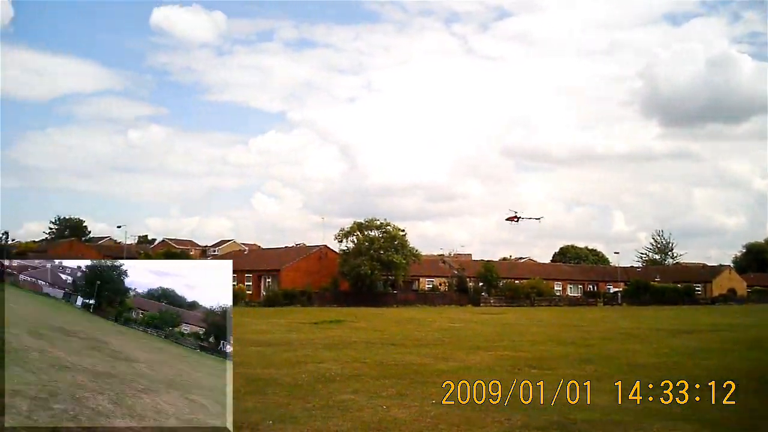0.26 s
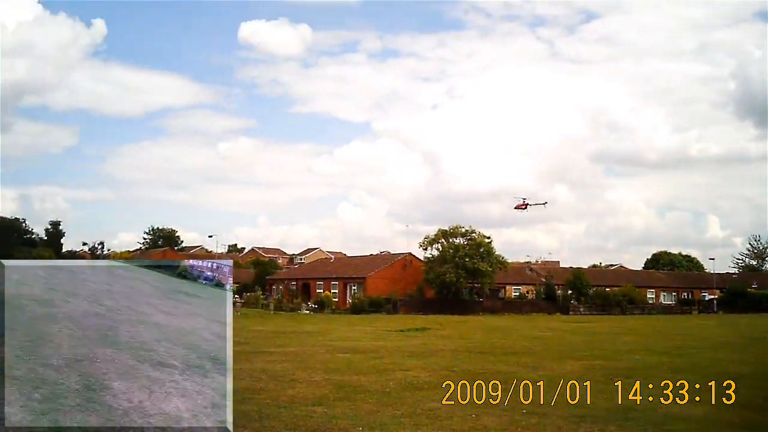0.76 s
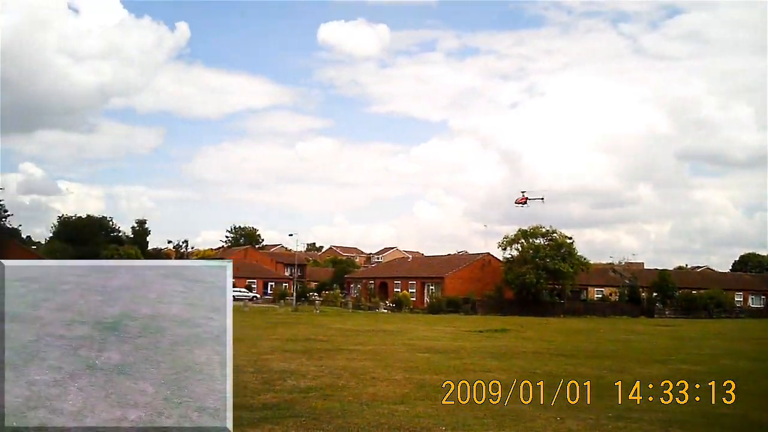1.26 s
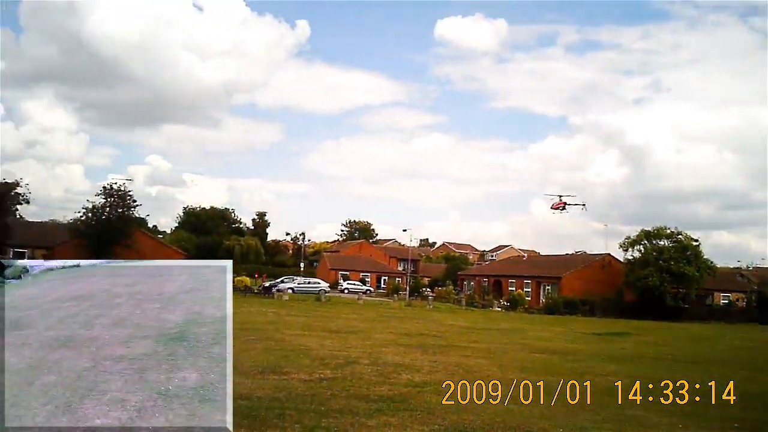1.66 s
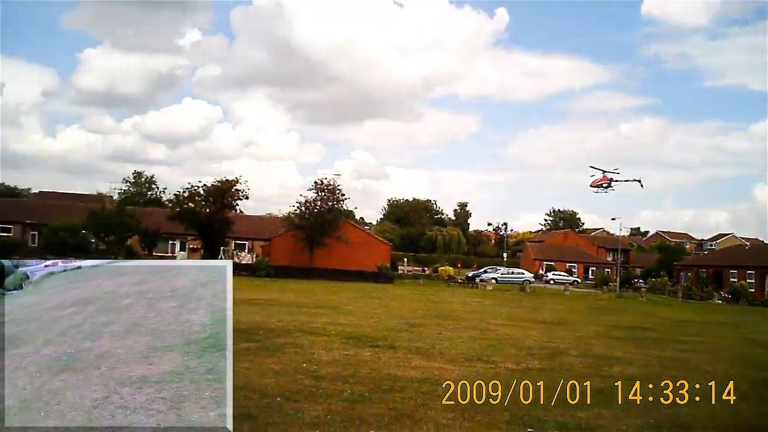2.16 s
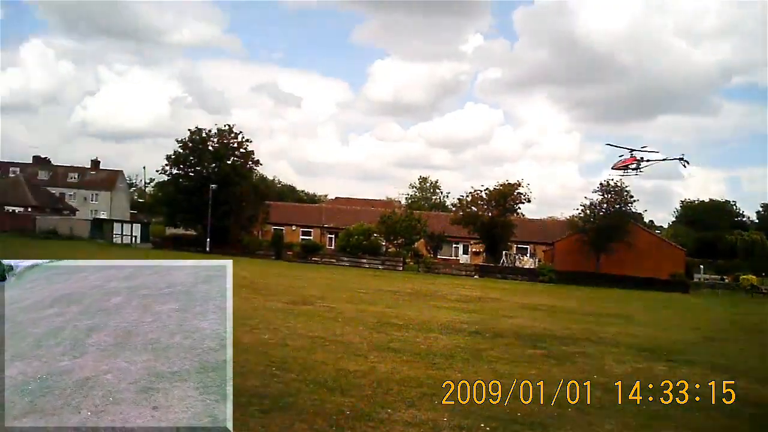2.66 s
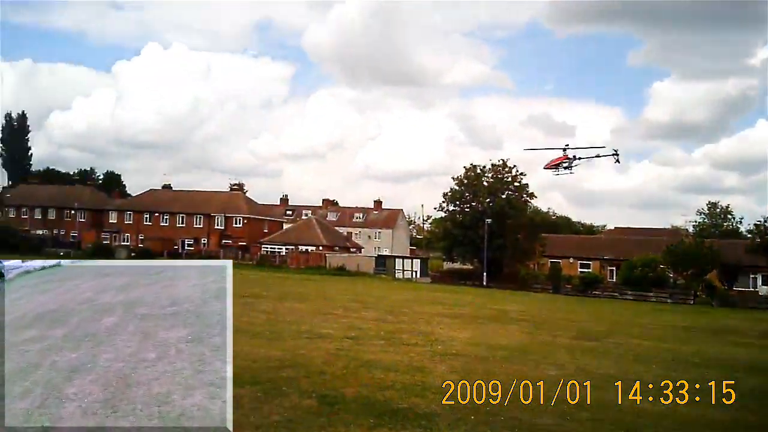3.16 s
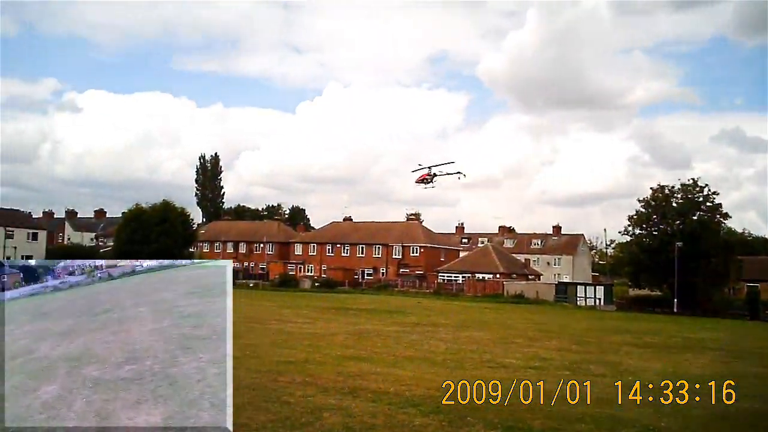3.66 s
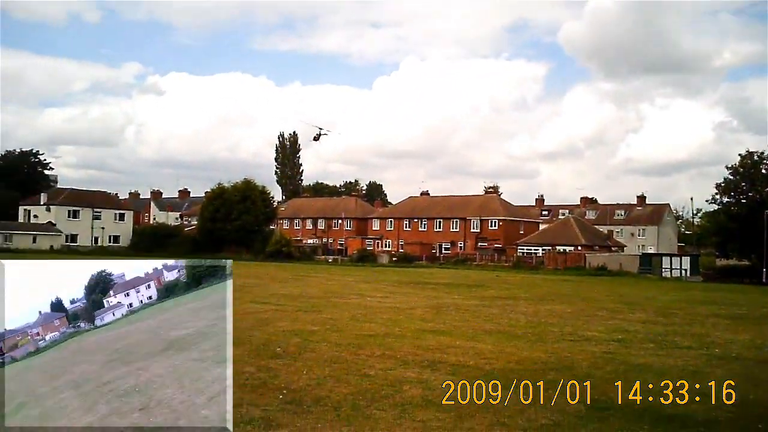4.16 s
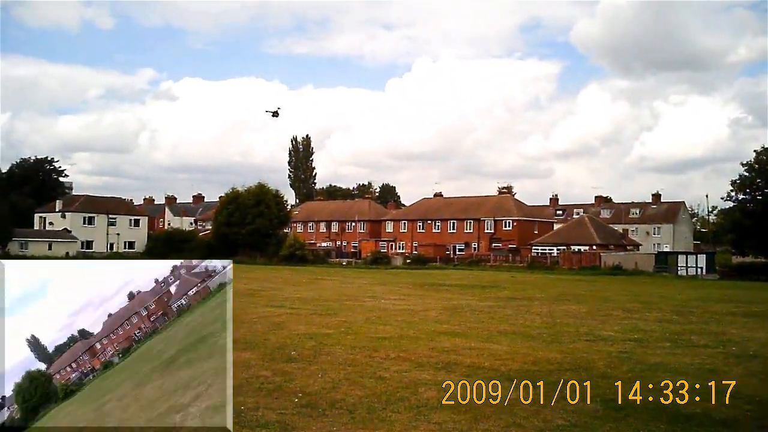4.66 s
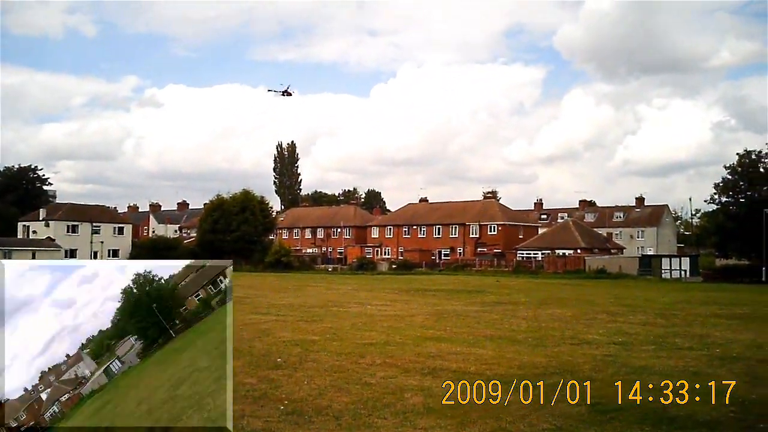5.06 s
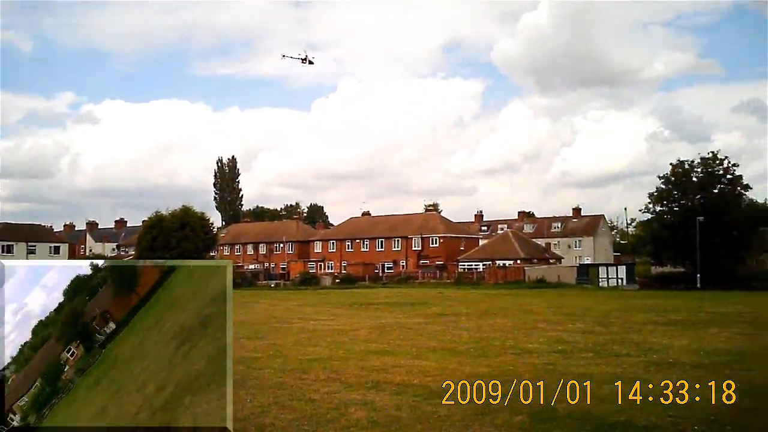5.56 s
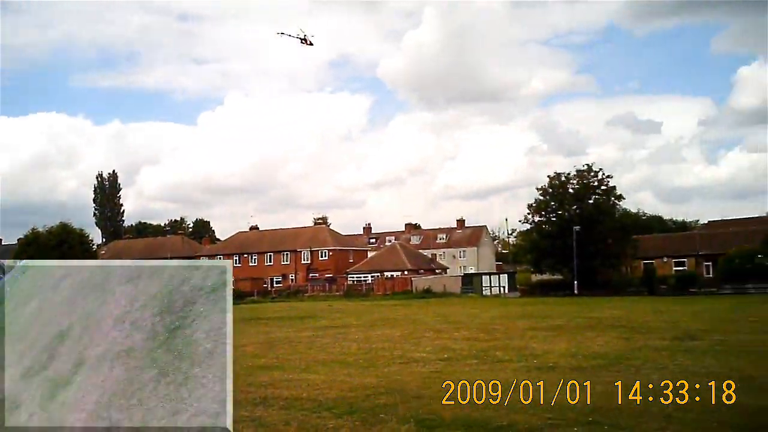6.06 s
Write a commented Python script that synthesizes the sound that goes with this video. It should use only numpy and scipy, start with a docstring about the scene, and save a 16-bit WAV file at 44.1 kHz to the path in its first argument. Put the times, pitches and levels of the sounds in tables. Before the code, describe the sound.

Wind buffets the microphone, then eases as a model helicopter's high motor whine and rotor buzz pass close and move away.

```python
"""A small electric helicopter passes over a park lawn. Motor, gears, main rotor and tail rotor turn in
fixed ratios, sounding tones at multiples (orders) of their shaft rates and modulating bands of noise.
The Doppler effect bends the pitch; directivity and distance set the level of each part.
Wind gusts buffet a small microphone and overload it on the deepest pushes.
A town murmurs in the distance, and a far bird chirps twice."""
import sys
import numpy as np
from scipy import signal
from scipy.fft import rfft, irfft
from scipy.io import wavfile

SR = 44100
rng = np.random.default_rng(int(sys.argv[2]) if len(sys.argv) > 2 else 0)


def store_pcm(level_fs):
    """Save levels as 16-bit WAV."""
    pcm = np.round(np.clip(level_fs, -1, 1) * 32767).astype(np.int16)
    wavfile.write(sys.argv[1], SR, np.atleast_2d(pcm).T)


N = 279153
TIME = np.arange(N) / SR
ROTOR_PER_MOTOR, TAIL_PER_MOTOR = 11 / 150, 11 / 150 * 106 / 25   # ratios of gear teeth

# Directivity of rotor swish, tail buzz, gear rasp and hiss. Every lobe table holds an all-round
# level/dB, then rows of heading/deg, half width/deg, level/dB.
SWISH_LOBES = -48.5, [(65.6, 65, -41), (295, 64, -42)]
BUZZ_LOBES = -58, [(86, 27, -44), (242.6, 9.4, -51), (311, 35, -51)]
RASP_LOBES = -52, [(61.4, 54, -45.5), (324, 37, -49.5)]
HISS_LOBES = -44, [(75.5, 33, -43), (314, 52, -43)]


def from_db(db):
    """Amplitude ratio of a level in dB."""
    return np.exp(np.asarray(db) * np.log(10) / 20)


def power_sum(levels_db):
    """Incoherent sources add in power; returns their joint level in dB."""
    return 10 * np.log10(sum(from_db(db) ** 2 for db in levels_db))


def in_time(rows):
    """Linear interpolation of a table's columns to one value per sample."""
    times, *columns = np.transpose(rows)
    return [np.interp(TIME, times, column) for column in columns]


def coloured(spectrum, lo_hz, hi_hz, source=None):
    """Spectral shaping of white noise, or another flat source of rms 1, to rms 1 within lo_hz..hi_hz."""
    hz = np.arange(1, N // 2 + 2) * SR / N
    points_hz, points_db = np.transpose(spectrum)
    gain = from_db(np.interp(np.log(hz), np.log(points_hz), points_db, left=-90, right=-90))
    band_power = np.sum(gain[(hz > lo_hz) & (hz < hi_hz)] ** 2) * 2 / N
    if source is None:
        source = rng.standard_normal(N)
    return irfft(rfft(source) * gain, N) / np.sqrt(band_power)


def drift(rate_hz):
    """Low-pass random fluctuation with a standard deviation of 1."""
    pole = np.exp(-80 * np.pi * rate_hz / SR)
    slow = signal.lfilter([1], [1, -2 * pole, pole * pole], rng.standard_normal(N // 40 + 2002))[2000:]
    return np.interp(np.arange(N) / 40, np.arange(len(slow)), slow / slow.std())


def tone(angle, level_db, waver_db):
    """A sinusoid locked to a shaft angle; moving air makes its level fluctuate."""
    amplitude = np.sqrt(2) * from_db(level_db + waver_db * drift(2.13))
    return amplitude * np.sin(angle + rng.uniform(0, 2 * np.pi))


def flight(speed_m_per_s=5.525, start_m=22.7):
    """Radial motion on a looping path: returns heading/deg, distance/m and Doppler factor."""
    # angle between nose and listener, 0 coming, 180 leaving: t/s, heading/deg
    loop = [(0, -77), (.81, -17), (1.81, 13), (2.62, 42), (3.81, 117), (4.11, 148.7), (4.42, 166.5),
            (4.8, 228), (5.58, 267.4), (6.33, 341)]
    heading, = in_time(loop)
    closing = speed_m_per_s * np.cos(np.radians(heading))
    return heading, start_m - np.cumsum(closing) / SR, 1 + closing / 343


def heard_db(pattern, reference_m=9.0):
    """Directivity and spherical spreading give a part's level; lobes have flat tops and steep sides."""
    heading, metres, _ = flight()
    all_round_db, lobes = pattern
    levels_db = [all_round_db]
    for centre, width, db in lobes:
        off_axis = np.abs((heading - centre + 180) % 360 - 180)
        levels_db.append(np.maximum(db - 4.3 * (off_axis / width) ** 3, -120))
    return power_sum(levels_db) - 20 * np.log10(metres / reference_m)


def tail_blades(tail):
    """Periodic loading: the tail rotor sounds its blade-passing frequency and the octave above."""
    # directivity of the two tones: lobe tables
    blade_lobes = -55.5, [(34.6, 19, -48.5), (128, 20, -51), (217.5, 49, -41.5), (307.3, 7.5, -35)]
    whine_lobes = -56.5, [(22.5, 38, -40), (67.8, 18, -38.5)]
    blade = tone(2 * tail, heard_db(blade_lobes), waver_db=1.0)
    return blade + tone(4 * tail, heard_db(whine_lobes), waver_db=1.0)


def gear_whine(motor, heading):
    """Tooth meshing: the pinion sounds motor order 11, among side tones and higher orders."""
    # directivity of the gear tones: lobe tables
    sing_lobes = -62, [(30, 11, -46), (335, 25, -55)]
    lower_lobes = -70, [(97, 13, -53), (175, 55, -63)]
    mesh_lobes = -63, [(35, 9, -54), (97, 9, -47), (145, 17, -46), (185, 22, -52), (234, 16, -44.5),
                  (266, 11, -45.5), (298, 11, -48), (323, 14, -45)]
    upper_lobes = -60, [(10, 25, -52), (100, 52, -47), (318, 24, -47)]
    octave_lobes = -57, [(80, 25, -44.5), (290, 20, -53)]
    top_lobes = -76, [(114, 14, -60), (210, 60, -66)]
    sing_db = heard_db(sing_lobes)
    shadow_db = 14 * np.clip((heading - 125) / 20, 0, 1)   # the body hides some tones from behind
    forward_db = heard_db(RASP_LOBES) - 8 - shadow_db
    whir_db = np.maximum(heard_db(BUZZ_LOBES) - 7, heard_db(SWISH_LOBES) - 16)
    orders = [(4, sing_db - 4), (10, heard_db(lower_lobes)), (11, heard_db(mesh_lobes)),
              (12, heard_db(upper_lobes)), (171.65 * ROTOR_PER_MOTOR, sing_db),
              (8, whir_db), (25 * TAIL_PER_MOTOR, whir_db), (21, forward_db), (13, forward_db),
              (22, heard_db(octave_lobes)), (26, heard_db(top_lobes))]
    return sum(tone(order * motor, db, waver_db=1.8) for order, db in orders)


def motor_hum(motor, heading):
    """The motor's fundamental: one cycle a turn, with a slight forward bias."""
    return tone(motor, heard_db(SWISH_LOBES) - 10.5 + 1.4 * np.cos(np.radians(heading)), waver_db=2.5)


def tail_buzz(rotor, tail):
    """Blade-wake interaction: tail harmonics swell as the tail rotor cuts each main blade's wake."""
    # tail shaft harmonics: order, level/dB re the buzz
    harmonics = [(3, -8.5), (5, -6.5), (6, -1), (7, -7), (10, -5), (11, 0)]
    buzz_db = heard_db(BUZZ_LOBES)
    wake = 1 + 0.6 * np.cos(2 * rotor)
    return wake * sum(tone(order * tail, buzz_db + db, waver_db=1.5) for order, db in harmonics)


def shaft_partials(motor, wobble):
    """Weak orders of the three shafts follow the noise levels; the high ones wobble with the main gear."""
    # partials of each shaft: order, level/dB re the noise they sit in
    tail_tones = [(1, -6), (12, -17), (22, -19), (26, -20), (49, -22), (50, -20)]
    motor_tones = [(2, -19), (9, -23), (18, -15), (23, -17)]
    rotor_tones = [(6, -6), (32, -17), (52.9, -19), (147, -18), (154.22, -17), (158, -14), (164.64, -13),
                   (178.3, -14), (292, -16)]
    swish_db, hiss_db, rasp_db = map(heard_db, (SWISH_LOBES, HISS_LOBES, RASP_LOBES))
    out = np.zeros(N)
    for ratio, partials in [(TAIL_PER_MOTOR, tail_tones), (1, motor_tones), (ROTOR_PER_MOTOR, rotor_tones)]:
        for order, db in partials:
            motor_order = order * ratio
            if motor_order < 8.5:
                out += tone(motor_order * motor, swish_db + db, waver_db=2.5)
            else:
                noise_db = hiss_db if 14.5 < motor_order < 20.5 else rasp_db
                out += wobble * tone(motor_order * motor, noise_db + db, waver_db=2.5)
    return out


def rotor_swish(chop):
    """Broadband air noise, amplitude-modulated by the chopping blades."""
    # swish spectrum: f/Hz, density level/dB
    spectrum = [(120, 5), (250, -5), (1200, -5), (2000, -2.5), (2900, -2), (3650, -15), (4500, -6),
                (5300, -19), (5900, -17.5), (7000, -14)]
    return from_db(heard_db(SWISH_LOBES) + 0.27 * drift(57.0)) * chop * coloured(spectrum, 1780, 3600)


def lawn_echo(direct):
    """Comb filtering: a dull ground reflection, its delay moving with the flight, joins the direct sound."""
    # ground reflection: t/s, delay/ms, amplitude ratio
    reflection = [(0, 1.8, .1), (2.7, 1.7, .1), (3.1, 1.55, .5), (3.5, 1.48, .5), (3.9, 1.42, .4),
                  (4.4, 1.25, .4), (5.2, 1.5, .25), (6.33, 1.55, .45)]
    delay_ms, share = in_time(reflection)
    dull = signal.sosfilt(signal.butter(2, 5500, fs=SR, output="sos"), direct)
    return direct + share * np.interp(TIME - delay_ms / 1000, TIME, dull)


def tail_boom(rotor, chop):
    """Forced resonance: the boom rings with chopped noise and one jolt per main rotor turn."""
    # boom resonances: f/Hz, density level/dB
    resonances = [(1750, -44), (1900, 1.5), (2050, -24), (2200, 0), (2600, -2), (2750, -2), (2900, -36)]
    knocks = np.diff(rotor // (2 * np.pi), prepend=0) * from_db(2.0 * drift(20.0))
    jolts = coloured(resonances, 1000, 3300, source=knocks / knocks.std())
    return from_db(heard_db(BUZZ_LOBES)) * (chop * coloured(resonances, 1000, 3300) + .45 * jolts)


def gear_noise(motor, rotor, tail, doppler, passing_s=3.6):
    """Amplitude modulation by the shafts roughens three treble bands; the rasp is lower from behind."""
    # spectra on approach and from behind: f/Hz, density level/dB
    rasp_ahead = [(5800, -24), (6600, -1), (7250, 8.5), (7600, 5), (8200, -31)]
    rasp_behind = [(5200, -8.5), (6500, 0), (7050, 5.5), (7500, -34)]
    sheen_ahead = [(11600, -21), (12100, -1), (13500, -3), (14000, -25)]
    sheen_behind = [(12200, -12), (12800, 2), (13600, 0), (14000, -25)]
    hiss_spectrum = [(7400, -19), (8300, -20.5), (9600, -4), (10800, 1), (11700, -14), (13500, -23),
                     (14200, -25), (14900, -17), (15800, -24)]
    gone = np.clip((TIME - passing_s) / 0.87 + .5, 0, 1)
    ahead, behind = np.sqrt(1 - gone), np.sqrt(gone)   # equal-power crossfade
    rasp = ahead * coloured(rasp_ahead, 4330, 8700) + behind * coloured(rasp_behind, 6400, 7800)
    rasp = np.interp(np.cumsum(doppler), np.arange(N), rasp)   # its pitch bends with the tones
    flicker = 1.25 * drift(6.0)   # the treble flickers
    grind = 1 + 0.19 * np.cos(rotor) + 0.47 * np.cos(tail) + 0.43 * np.cos(motor)
    out = from_db(heard_db(RASP_LOBES) + 0.7 * flicker) * grind * rasp
    # directivity of the sheen, the top of the gear noise: lobe table
    sheen_lobes = -46.5, [(81.5, 24.4, -44), (310, 26, -55)]
    sheen = ahead * coloured(sheen_ahead, 11000, 15000) + behind * coloured(sheen_behind, 11000, 15000)
    out += from_db(heard_db(sheen_lobes) + 1.6 * drift(5.4)) * np.sqrt(np.abs(grind)) * sheen
    hiss = (1 + 0.034 * np.cos(rotor)) * coloured(hiss_spectrum, 9630, 10890)
    return out + from_db(heard_db(HISS_LOBES) + flicker) * hiss


def helicopter(motor_hz=571.2):
    """Gearing locks three shaft angles together, so one Doppler shift bends all their tones."""
    heading, _, doppler = flight()
    motor = 2 * np.pi * np.cumsum(motor_hz * doppler) / SR + 0.025 * drift(4.9)   # the path wavers
    rotor, tail = motor * ROTOR_PER_MOTOR, motor * TAIL_PER_MOTOR
    wobble = 1 + .3 * np.cos(rotor)   # the main gear runs out of true: teeth bite harder once a turn
    chop = 1 + 0.036 * np.cos(2 * tail) + 0.059 * np.cos(tail) + 0.034 * np.cos(2 * rotor)
    tones = tail_blades(tail) + wobble * gear_whine(motor, heading) + motor_hum(motor, heading)
    tones += tail_buzz(rotor, tail) + shaft_partials(motor, wobble)
    noise = lawn_echo(rotor_swish(chop)) + tail_boom(rotor, chop) + gear_noise(motor, rotor, tail, doppler)
    return tones + noise


def turbulence(rise_db_per_s=224, fall_db_per_s=99):
    """Turbulent pressure at the microphone: slow swings rumble and small eddies flutter in bursts."""
    # steady wind: t/s, rumble level/dB
    breeze = [(0, -12.5), (.3, -21), (1.4, -18), (2.4, -29.5), (3.3, -26), (3.9, -31.5), (4.7, -31.5),
              (5.4, -24.5), (6.33, -18)]
    # gusts: t/s at full strength, hold/s, flutter level/dB
    gusts = [(0.093, 0.072, -32.5), (0.446, 0.23, -21), (0.77, 0.2, -19.5), (1.132, 0.19, -24.5),
             (1.403, 0.14, -33), (1.97, 0.14, -35.5), (2.14, 0.13, -34.5), (5.086, 0.078, -31),
             (5.73, 0.026, -40.5), (5.96, 0.052, -29), (6.158, 0.092, -39)]
    # pressure spectra: f/Hz, density level/dB
    rumble_spectrum = [(6, -56), (15, 3.5), (37, 0), (90, -7.5), (150, -23.5), (300, -48)]
    flutter_spectrum = [(50, 7.5), (110, 9.5), (200, 2.5), (400, -12), (1700, -36.5), (3500, -38.5)]
    breeze_db, = in_time(breeze)
    gust_db = power_sum(db - rise_db_per_s * np.clip(start - TIME, 0, 1)
                        - fall_db_per_s * np.clip(TIME - start - hold, 0, 1) for start, hold, db in gusts)
    rumble_db = power_sum([breeze_db, gust_db + 8.5])
    flutter_db = power_sum([breeze_db - 24.5, gust_db])
    lumps = drift(10.3)
    rumble = from_db(rumble_db + 1.54 * lumps) * coloured(rumble_spectrum, 23.0, 110)
    eddies = from_db(flutter_db + 3.2 * drift(58.0) + 1.1 * lumps - 1.5)
    return rumble + eddies * coloured(flutter_spectrum, 182.3, 330)


def town(level_db=-56.5):
    """Stationary noise: the low murmur of a far town."""
    # murmur spectrum: f/Hz, density level/dB
    spectrum = [(150, -14), (300, -3.5), (600, -7), (1000, -2), (1600, -27)]
    return from_db(level_db) * coloured(spectrum, 346, 690)


def buffets(rise_s=0.0047):
    """Pressure transients: sudden slaps of wind rise quickly and decay more slowly."""
    # slaps: t/s, peak level/dB
    slaps = [(0.176, -22), (0.428, -22), (0.468, -20.5), (0.582, -12), (0.637, -14), (0.656, -19),
             (0.677, -17.5), (0.78, -14), (0.866, -19), (0.955, -29), (1.098, -20.5), (1.126, -18.5),
             (1.207, 0.5), (1.279, -20), (5.107, -25), (5.21, -28)]
    # slap spectrum: f/Hz, density level/dB
    spectrum = [(80, 3), (250, 11.5), (700, -0.5), (1600, -15), (3500, -39)]
    envelope = np.zeros(N)
    for start, db in slaps:
        age = np.clip((TIME - start) / rise_s, 0, 30)
        envelope += from_db(db) * age * np.exp(1 - age)
    return envelope * coloured(spectrum, 150, 1500)


def deep_pushes(wind):
    """Soft limiting holds the wind's rumble down, so only single deep thumps overload and crackle."""
    # pushes of the diaphragm: t/s, depth (negative outward), half length/s
    pushes = [(.177, -.88, .008), (.708, .85, .010), (.786, .86, .006), (.870, .97, .010),
              (.958, .95, .008), (1.211, 1.02, .007), (1.2175, -.45, .004), (1.224, 1.09, .007)]
    out = 0.84 * np.tanh(wind / 0.84)
    for centre, depth, half_length in pushes:
        bell = np.cos(np.pi / 2 * np.clip((TIME - centre) / half_length, -1, 1)) ** 2
        out = out * (1 - bell) - depth * bell
    return out


def bird():
    """Frequency modulation: two short whistles glide down with a slight jitter."""
    # chirps: t/s, length/s, starting f/Hz, final f/Hz, level/dB
    chirps = [(0.98, 0.051, 5650, 5250, -56), (2.282, .12, 5600, 5000, -54)]
    out = np.zeros(N)
    for start, length, from_hz, to_hz, db in chirps:
        progress = np.clip((TIME - start) / length, 0, 1)
        hz = from_hz + (to_hz - from_hz) * progress + 60 * drift(80.0)
        out += np.sqrt(2) * from_db(db) * np.sin(np.pi * progress) * np.sin(2 * np.pi * np.cumsum(hz) / SR)
    return out


def scene():
    """Superposition of helicopter, bird, wind and town at one microphone."""
    return (helicopter() + bird() + deep_pushes(turbulence() + buffets()) + town())[None, :]


def record(dry):
    """Overload: big swings flatten and crackle, the biggest duck the gain; a low-pass cuts the top."""
    overload, duck_threshold, dc_offset = .8, 1.05, .016
    depth_db, recover_db_per_s, cutoff_hz = 7.0, 90, 15676
    crackle = signal.lfilter([.35], [1, -.88], rng.standard_normal(N))
    ragged = from_db(-27.0) * crackle * np.clip((np.abs(dry) - overload) / 0.042, 0, 1)
    flattened = dry / (1 + np.abs(dry / 1.02) ** 8) ** (1 / 8)
    recovery = recover_db_per_s * TIME
    duck_db = np.maximum.accumulate(depth_db * (np.abs(dry[0]) > duck_threshold) + recovery) - recovery
    duck_db = signal.lfilter([.0012], [1, -.9988], duck_db)   # smoothed over about 19 ms
    low_pass = signal.ellip(10, .5, 50, cutoff_hz, fs=SR, output="sos")
    return signal.sosfilt(low_pass, (flattened + ragged) * from_db(-duck_db) + dc_offset)


dry = scene()
out = record(dry)
store_pcm(out)
```